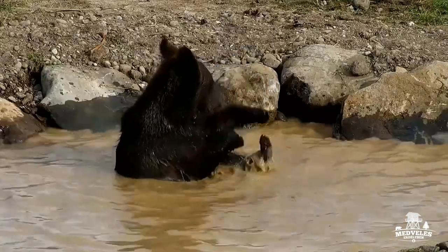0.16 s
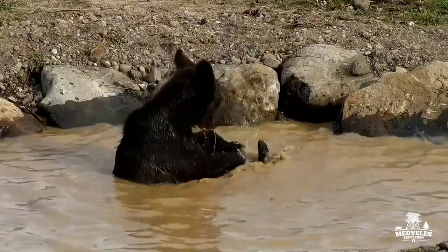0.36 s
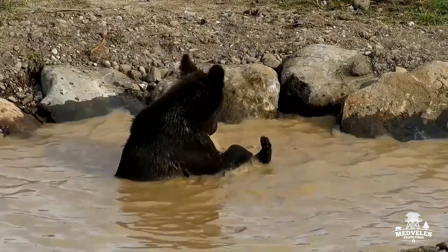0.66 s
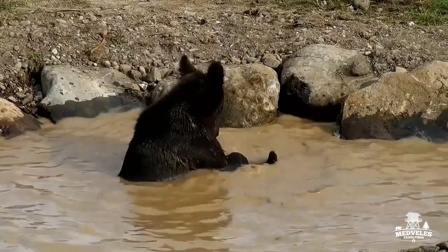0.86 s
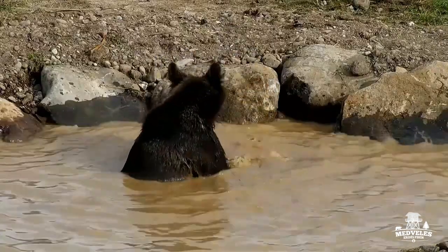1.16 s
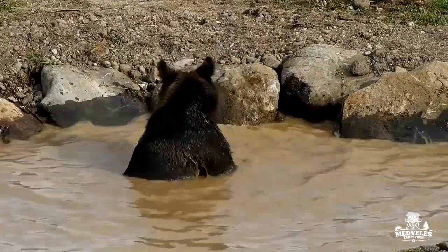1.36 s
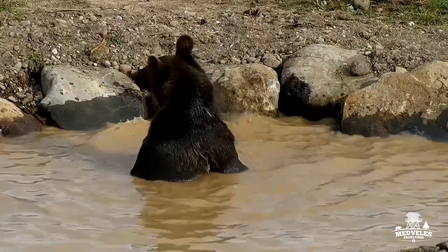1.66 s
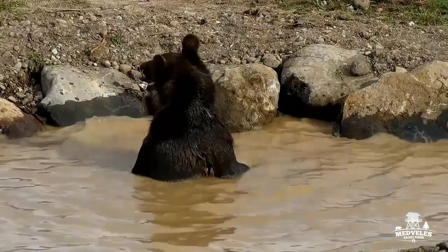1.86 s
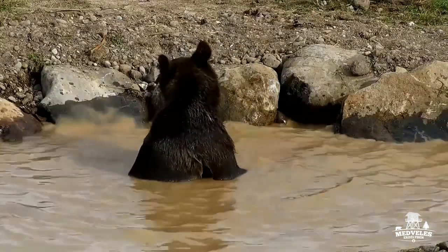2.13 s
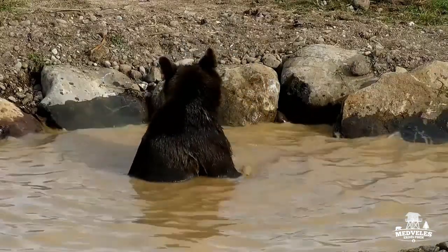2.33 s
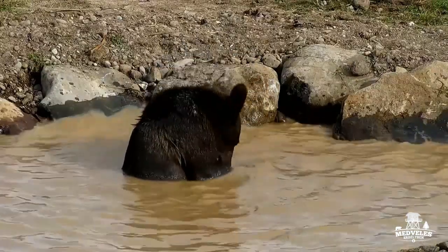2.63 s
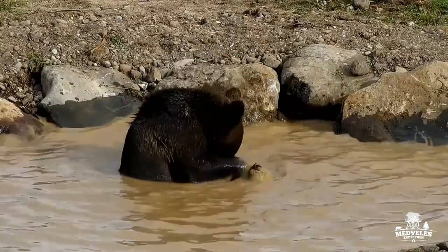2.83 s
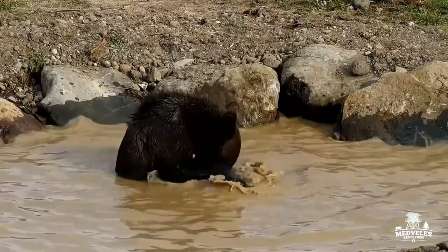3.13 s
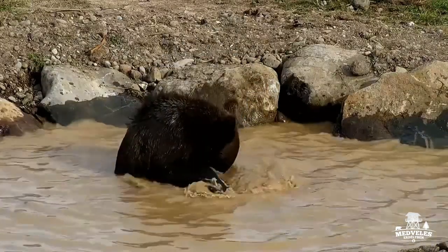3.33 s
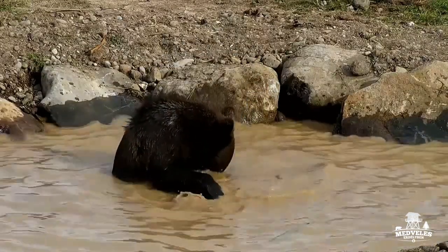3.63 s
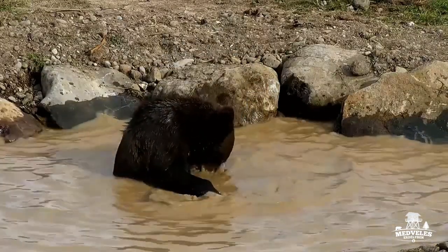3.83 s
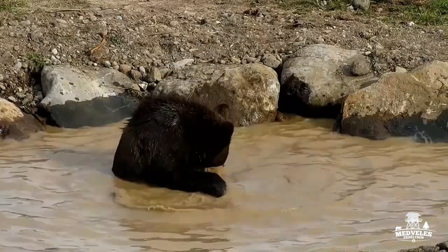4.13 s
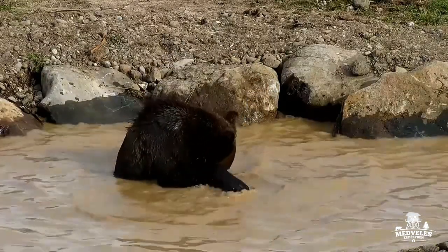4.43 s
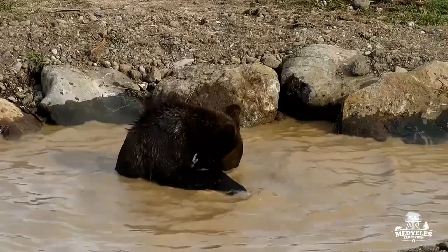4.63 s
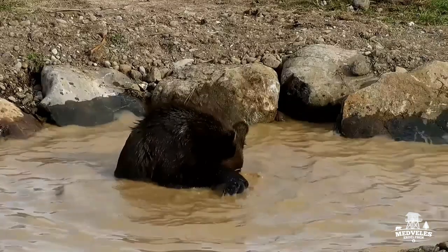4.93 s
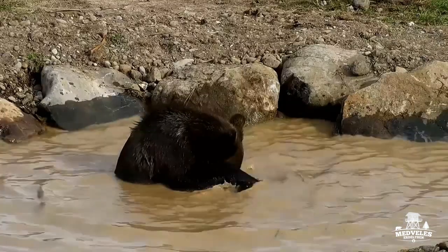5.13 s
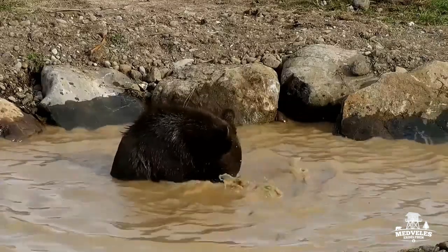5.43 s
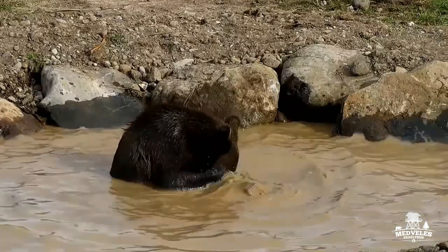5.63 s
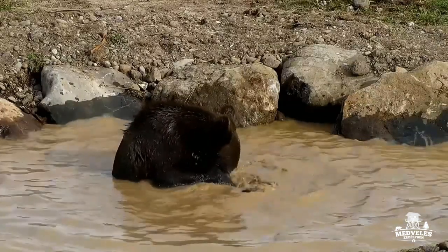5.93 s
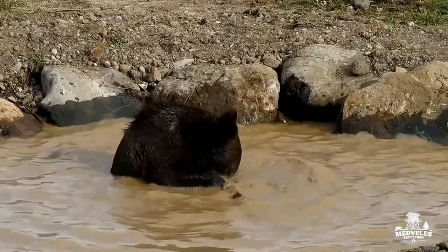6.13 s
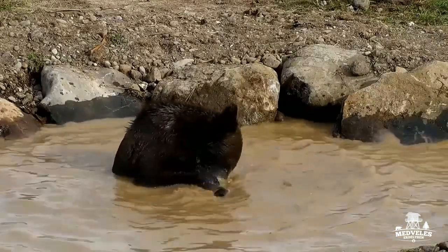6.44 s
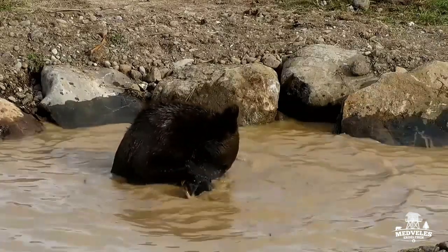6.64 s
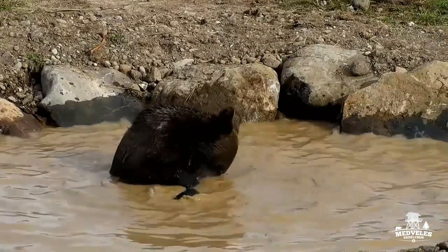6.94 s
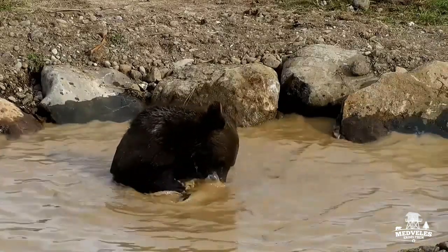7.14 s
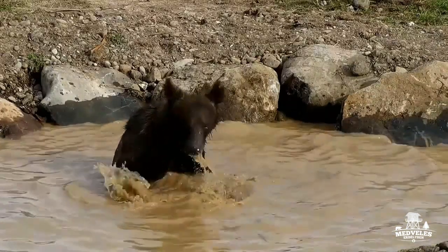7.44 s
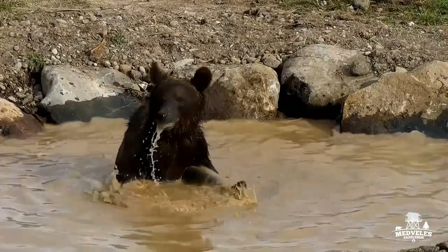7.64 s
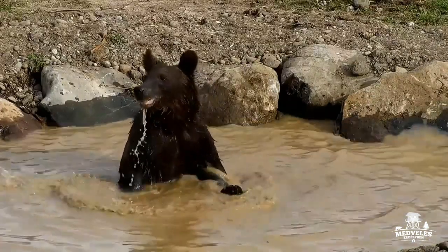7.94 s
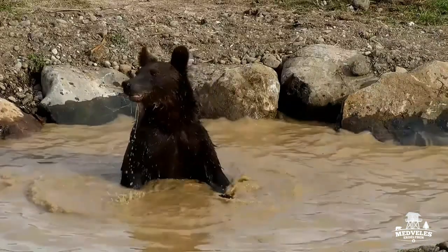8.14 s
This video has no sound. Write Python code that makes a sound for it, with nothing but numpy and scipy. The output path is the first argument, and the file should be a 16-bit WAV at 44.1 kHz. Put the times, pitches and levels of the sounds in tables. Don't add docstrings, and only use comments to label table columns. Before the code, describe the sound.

Wet splashes and gurgling bubbles from a bear stirring shallow water, pausing between bouts, then a loud closing slosh with dripping drops outdoors.

```python
import sys
import numpy as np
from scipy import signal
from scipy.io import wavfile
from scipy.ndimage import uniform_filter1d, map_coordinates

SR = 44100
rng = np.random.default_rng(int(sys.argv[2]) if len(sys.argv) > 2 else 0)


def invert_db(level):
    return 10 ** (np.asarray(level, dtype=float) / 20)


def wrap_up_sound(samples):
    columns = np.atleast_2d(samples).T
    tamed = np.clip(columns, -1, 1)
    steps = np.round(tamed * 32767).astype(np.int16)
    wavfile.write(sys.argv[1], SR, steps)


N = 365588

# pitch_hz, density_db (per Hz)
SPRAY_COLOR = [(900, -13.5), (1400, -9), (1800, -9), (2300, -6), (2900, -0.5), (3400, -0.5), (3800, -4),
               (4300, -6), (5500, -47.5)]
# start_s, spray_db, gurgle_db, fade_s (to fall 20 dB)
PAW_STROKES = [(0.01, -35, -37, 0.0963), (0.14, -41.5, -52, 0.2946), (0.44, -27, -40.5, 0.22),
               (0.509, -42, -34.5, 0.3255), (0.641, -32.5, -43.5, 0.1213), (0.895, -43.5, -44.5, 0.39),
               (1.3, -46, -42, 0.21), (1.42, -46.5, -51, 0.14), (2.0, -68.5, -46.5, 0.04),
               (2.79, -51, -62.5, 0.55), (2.97, -65, -49.5, 3.1), (3.16, -38.5, -38.5, 0.06),
               (3.24, -35.5, -34.5, 0.6662), (3.47, -37.0, -41, 0.4), (3.66, -50, -35.5, 0.4463),
               (3.79, -39.5, -35.5, 0.132), (3.9, -51, -53.5, 0.97), (4.57, -42, -50, 0.3067),
               (4.72, -45, -44, 0.2657), (4.886, -43, -41.5, 0.1237), (5.0, -59, -52.5, 0.73),
               (5.415, -33.0, -30.5, 0.2014), (5.5, -31, -30.5, 0.1534), (5.719, -37, -52, 0.16),
               (5.971, -44.5, -42.5, 0.18), (6.687, -43, -44, 0.0844), (7.357, -28, -24.5, 0.2772),
               (7.561, -23.5, -27.5, 0.14), (7.89, -35, -44.0, 0.5163)]
# start_s, spray_db, gurgle_db, fade_s (to fall 20 dB)
MORE_STROKES = [(0.06, -43, -43, 0.36), (0.32, -49.5, -49, 0.75), (0.39, -39, -48, 0.1069),
                (1.05, -52.5, -52, 0.36), (1.24, -49, -42, 0.1676), (2.47, -54, -63.5, 0.25),
                (4.2, -48.5, -52.5, 0.01), (4.44, -46.5, -46.0, 0.42), (5.27, -48.5, -53, 0.35),
                (5.6, -35.5, -35, 0.2609), (6.08, -46, -48.0, 0.1566), (6.2, -57.5, -60.5, 0.5),
                (6.8, -53, -50.0, 0.2329), (7.01, -47, -68.5, 0.1364), (7.42, -24.5, -22.0, 0.1961),
                (7.67, -33.5, -33.5, 0.1542), (7.74, -38.5, -37.5, 0.3125), (8.05, -42.5, -54, 0.98)]
DENSE_FROM_DB, DENSE_SHARE = -32, 0.437


def evened(x):
    return x / np.sqrt(np.mean(x ** 2) + 1e-20)


def read(points, hz):
    f, value = np.transpose(points)
    return np.interp(np.log(hz + 1), np.log(f + 1), value, left=-100, right=-100)


def add(mix, s, sound):
    part = mix[max(round(s * SR), 0):][:len(sound)]
    part += sound[:len(part)]


def swells(s, peak_db, rise_s, fade_s, calm_db):
    hold = 1.68
    t = np.arange(0, N / SR + .01, .001)[:, None] - s
    fallen = np.maximum(-t / rise_s, np.maximum(t / fade_s, 0) ** hold)
    power = invert_db(2 * (peak_db - 20 * fallen)).sum(axis=1) + invert_db(2 * calm_db)
    return np.interp(np.arange(N) / SR, np.arange(len(t)) / 1000, 10 * np.log10(power))


def noise(spectrum, size, patchy_db, flicker_db):
    frames, hz = 4 * N // size + 5, np.fft.rfftfreq(size, 1 / SR)
    a, b, patches = rng.standard_normal((frames, len(hz), 3)).T
    patches = uniform_filter1d(patches, size=3, axis=0)
    patches = evened(uniform_filter1d(patches, size=6000 // size, axis=1))
    flicker = evened(uniform_filter1d(rng.standard_normal(frames), size=3))
    level_db = read(spectrum, hz)[:, None] + patchy_db * patches + flicker_db * flicker
    z = (a + 1j * b) * invert_db(level_db)
    return evened(signal.istft(z, nperseg=size, noverlap=3 * size // 4)[1][:N])


def ring(hz, t60, rise, soft):
    t = np.arange(int(.25 * SR)) / SR
    turns = hz * (t + rise * t ** 2 / t60)
    onset = 1 - np.exp(-t * hz / soft)
    return np.sin(2 * np.pi * turns) * invert_db(-60 * t / t60) * onset


def grains(spectrum, per_s, cycles, spread_db, count):
    out = np.zeros(N)
    for hz in np.geomspace(spectrum[1][0], spectrum[-2][0], count):
        when, chance, sign = rng.random((2000, 3)).T
        at = np.cumsum(-np.log(when) * SR * count / per_s).astype(int)
        size = invert_db(spread_db * np.minimum(-np.log(chance), 4)) * np.sign(sign - .5)
        train = np.bincount(at[at < N], size[at < N], N)
        shape = evened(ring(hz, cycles / hz, rise=0.102, soft=1.0))[:3000]
        out += signal.oaconvolve(train, shape * np.sqrt(hz) * invert_db(read(spectrum, hz)))[:N]
    return out / np.sqrt(uniform_filter1d(out ** 2, size=6000) + 0.015 * np.mean(out ** 2))


def spray():
    s, spray_db, _, fade_s = np.transpose(PAW_STROKES + MORE_STROKES)
    level_db = swells(s, spray_db, rise_s=0.0241, fade_s=fade_s, calm_db=-61)
    hiss = noise(SPRAY_COLOR, size=256, patchy_db=3.8, flicker_db=2.4)
    crackle = grains(SPRAY_COLOR, per_s=800, cycles=13.0, spread_db=2.8, count=14)
    fused_db = DENSE_SHARE * np.maximum(level_db - DENSE_FROM_DB, 0)
    crackle_db = np.minimum(.5 * (level_db + 56.5), 0) - 3.5 - fused_db
    full = invert_db(0.33) * hiss + invert_db(crackle_db) * crackle
    body_hz, body_full_db = 2234, -32.5
    body = signal.oaconvolve(full, signal.firwin(101, body_hz, fs=SR), "same")
    body_db = np.clip(0.281 * (level_db - body_full_db), -7, 2.5)
    return invert_db(level_db) * (full + (invert_db(body_db) - 1) * body)


def gurgle():
    # pitch_hz, density_db (per Hz)
    bubble_color = [(350, -41), (560, -1.5), (750, -2), (1000, -1.5), (1300, -2), (1600, -16), (2200, -5.5)]
    # pitch_hz, density_db (per Hz)
    slosh_color = [(180, -30), (270, 0), (350, -3), (450, -6.5), (560, 2.5), (750, -25)]
    # start_s, slosh_db
    surges = [(0.0, -46), (0.52, -38), (0.58, -41), (0.7, -47), (0.9, -45), (1.22, -48), (3.61, -40),
              (3.66, -37.5), (3.71, -35.5), (3.85, -42), (4.76, -46), (5.47, -38.5), (5.55, -41),
              (5.6, -40), (6.52, -47.5), (6.72, -47.5), (7.03, -45.5), (7.37, -36.5), (7.57, -30),
              (7.73, -45)]
    s, _, gurgle_db, fade_s = np.transpose(PAW_STROKES + MORE_STROKES)
    lingering_s = 1.048 * fade_s
    level_db = swells(s, gurgle_db, rise_s=0.0262, fade_s=lingering_s, calm_db=-56)
    surge = invert_db(swells(*np.transpose(surges), rise_s=0.0482, fade_s=0.106, calm_db=-58))
    churn = noise(bubble_color, size=512, patchy_db=3.0, flicker_db=-0.5)
    swarm = grains(bubble_color, per_s=700, cycles=13.3, spread_db=3.5, count=16)
    deep = grains(slosh_color, per_s=120, cycles=15.4, spread_db=1.5, count=8)
    fused_db = DENSE_SHARE / 2 * np.maximum(level_db - DENSE_FROM_DB, 0)
    small = invert_db(level_db) * (invert_db(fused_db - 9.5) * churn + invert_db(-5.5 - fused_db) * swarm)
    slosh = np.hypot(surge, invert_db(level_db - 24))
    return small + invert_db(-2.5) * slosh * deep


def drops():
    # start_s, peak_db,
    # pitch_hz
    smacks = [(0.0313, -15, 2535), (0.1467, -15, 3046), (0.1973, -16, 3571), (0.4562, -7, 3165),
              (0.5578, -10, 2979), (0.6823, -19, 2861), (0.8957, -23, 2920), (0.9007, -24, 3165),
              (0.988, -17, 3295), (1.0603, -21, 2748), (1.2395, -25, 2979), (1.3086, -26, 3040),
              (1.4145, -25, 3430), (1.4308, -24, 3644), (2.493, -30, 3229), (2.7941, -24, 2979),
              (2.8422, -21, 3295), (2.8939, -24, 2920), (3.02, -26, 2485), (3.1565, -19, 3295),
              (3.1615, -20, 2979), (3.1723, -12, 3229), (3.2512, -17, 2535), (3.2515, -9, 3295),
              (3.2544, -17, 1912), (3.2837, -10, 3295), (3.3066, -7, 2435), (3.3762, -15, 2920),
              (3.4102, -16, 3295), (3.5054, -12, 2920), (3.5755, -16, 3295), (3.5844, -15, 2693),
              (3.6635, -19, 2031), (3.8186, -19, 3500), (3.9918, -26, 3295), (4.217, -20, 2861),
              (4.2231, -28, 2861), (4.4263, -27, 2861), (4.4263, -25, 1951), (4.4265, -26, 3571),
              (4.4689, -24, 3295), (4.4696, -26, 2387), (4.6063, -24, 3718), (4.6685, -21, 3229),
              (4.7712, -20, 2158), (4.8982, -27, 1912), (4.9057, -25, 2920), (5.2066, -31, 2387),
              (5.2744, -10, 2920), (5.2859, -17, 2748), (5.3245, -22, 3229), (5.4163, -11, 2247),
              (5.4172, -9, 2979), (5.4338, -6, 2979), (5.476, -5, 2640), (5.515, -7, 3229),
              (5.524, -11, 3229), (5.5655, -8, 3430), (5.6016, -8, 3229), (5.7413, -17, 2861),
              (5.7417, -20, 1991), (6.0043, -29, 2073), (6.0045, -23, 3229), (6.1977, -21, 3571),
             (6.7147, -17, 2920), (6.8401, -25, 3295), (6.9329, -17, 3229), (7.027, -25, 3102),
             (7.0361, -24, 3295), (7.4365, -11, 2031), (7.5766, -2, 2485), (7.5898, -7, 2640),
             (7.7644, -14, 2748), (7.902, -6, 3500), (7.9023, -8, 2861), (7.9338, -12, 3295),
             (8.0832, -17, 2387), (8.1354, -19, 1951), (8.2685, -5, 3229)]
    # start_s, peak_db, pitch_hz
    plinks = [(0.015, -17, 2979), (0.4295, -27, 2073), (0.463, -13, 2920), (0.5179, -17, 3040),
              (0.6592, -21, 3362), (0.8637, -29, 2485), (0.8914, -32, 2158), (0.9197, -30, 3304),
              (2.8941, -26, 3718), (3.2442, -25, 2435), (3.481, -23, 2640), (3.8005, -14, 3571),
              (4.2989, -35, 2158), (4.7438, -26, 2158), (4.8923, -28, 2804), (4.8998, -31, 2804),
              (5.5354, -14, 2693), (6.0873, -31, 2861), (6.1556, -32, 3270), (6.2986, -39, 2115),
              (6.6855, -27, 2387), (6.6977, -22, 2748), (6.717, -27, 1951), (7.0172, -20, 3102),
              (7.3696, -17, 2979), (7.4166, -11, 2031), (7.4311, -16, 2031), (7.585, -12, 2920),
              (7.5991, -18, 2031), (7.6844, -19, 2435), (8.0229, -18, 2804)]
    smack_rise_s, smack_t60, smack_wide = .001, .02, 1.45
    events = [(*row, .013) for row in smacks] + [(*row, .03) for row in plinks]
    out = np.zeros(N)
    puff = noise(SPRAY_COLOR, size=256, patchy_db=1.0, flicker_db=0.71)
    t = np.arange(int(.25 * SR)) / SR
    for s, db, hz, t60 in events:
        band = signal.butter(2, [hz / smack_wide, hz * smack_wide], "band", fs=SR)
        burst = evened(signal.lfilter(*band, np.resize(puff[round(s * SR):], len(t))))
        burst = burst * invert_db(-11.5 - 60 * t / smack_t60) * np.minimum(t / smack_rise_s, 1)
        add(out, s, invert_db(db) * (burst + invert_db(-1.7) * ring(hz, t60, rise=.05, soft=2.5)))
    return out


def bubbles():
    # start_s, peak_db, pitch_hz, t60_s
    pockets = [(0.007, -31.5, 1258, 0.035), (0.331, -30, 1246, 0.023), (0.434, -25, 928, 0.032),
               (0.44, -28.5, 732, 0.064), (0.501, -14, 1000, 0.0203), (0.502, -26, 639.6, 0.087),
               (0.507, -26, 1630, 0.021), (0.517, -23, 1001, 0.07), (0.518, -21, 1282, 0.07),
               (0.519, -12.5, 634, 0.0274), (0.556, -25, 1253, 0.031), (0.652, -37, 680, 0.087),
               (0.658, -17.5, 915, 0.022), (0.671, -31.5, 1869, 0.022), (0.844, -30, 607, 0.046),
               (0.894, -29, 1267, 0.0316), (1.236, -43, 1547, 0.105), (1.243, -37.5, 1322, 0.1),
               (1.307, -17.5, 978, 0.0228), (1.308, -20, 623, 0.0184), (1.34, -27.5, 698, 0.042),
               (1.343, -22.5, 1253, 0.0204), (1.423, -38.5, 1940, 0.048), (1.434, -23, 1615, 0.0247),
               (1.722, -35.5, 1546, 0.0202), (1.793, -29, 1216, 0.031), (1.832, -28.5, 831, 0.085),
               (1.992, -33.5, 621.6, 0.105), (2.016, -27, 1097, 0.076), (2.043, -37, 1292, 0.022),
               (2.047, -40, 1120, 0.065), (2.156, -36.5, 1544, 0.0223), (2.178, -40.5, 783, 0.108),
               (2.317, -46, 1069, 0.098), (2.355, -39.5, 712.4, 0.093), (2.854, -43, 1265, 0.047),
               (2.986, -32.5, 1007, 0.0506), (3.029, -26.5, 1282, 0.0366), (3.157, -20.5, 588, 0.082),
               (3.161, -18, 1232, 0.0228), (3.164, -19.5, 1600, 0.0227), (3.244, -17.5, 1514, 0.0226),
               (3.302, -25.5, 929, 0.076), (3.303, -25, 669, 0.0456), (3.368, -18.5, 1624, 0.0244),
               (3.37, -15.5, 690, 0.0223),
               (3.373, -19, 1000, 0.0214), (3.437, -24, 1546, 0.021), (3.448, -32.5, 615, 0.096),
               (3.553, -12.5, 1253, 0.0231), (3.571, -25.5, 1550, 0.034), (3.632, -20.5, 923, 0.0227),
               (3.632, -15.5, 638, 0.0198), (3.722, -25, 649.4, 0.103), (3.737, -20.5, 634.5, 0.043),
               (3.746, -21, 972, 0.0214), (3.793, -12, 488, 0.021), (3.795, -17.5, 731, 0.022),
               (3.805, -13.5, 900, 0.0204), (3.839, -16, 595, 0.0207), (4.235, -40.5, 1286, 0.068),
               (4.557, -29.5, 1290, 0.034), (4.727, -32, 1173, 0.062), (4.764, -23, 1508, 0.0214),
               (4.771, -35, 591.6, 0.104), (4.781, -37, 718.4, 0.102), (4.888, -32.5, 1354, 0.051),
               (4.889, -38.5, 928, 0.09), (4.891, -35.5, 1670, 0.035), (4.91, -27.5, 1022, 0.021),
               (5.225, -27.5, 945, 0.036), (5.397, -21.5, 1630, 0.065), (5.415, -30.5, 1522, 0.097),
               (5.416, -27.5, 882.5, 0.091), (5.432, -11, 1248, 0.0233), (5.459, -14, 656, 0.022),
               (5.494, -16, 1265, 0.0205), (5.524, -22, 1188, 0.032), (5.524, -19.5, 1555, 0.02),
               (5.526, -11, 885, 0.0231), (5.575, -26, 1123, 0.095), (5.607, -24.5, 567.4, 0.095),
               (5.74, -25.5, 1800, 0.022), (5.742, -19, 1205, 0.0233), (5.745, -25, 685, 0.02),
               (5.821, -27, 1252, 0.0337), (5.964, -36, 978, 0.09), (5.99, -34, 968, 0.07),
               (6.01, -31.5, 1328, 0.049), (6.045, -33, 696, 0.059), (6.094, -37.5, 1409, 0.102),
               (6.257, -26.5, 633.5, 0.0298),
               (6.409, -37.5, 1287, 0.074), (6.609, -34, 1740, 0.0346), (6.698, -30, 1860, 0.0234),
              (6.713, -22.5, 647, 0.0199), (6.714, -18.5, 1274, 0.022), (6.839, -26, 1300, 0.0216),
              (6.838, -18.5, 913, 0.0201), (6.84, -26, 660, 0.0223), (6.858, -35.5, 788, 0.069),
              (7.354, -16, 540, 0.082), (7.355, -12, 971.2, 0.0437), (7.358, -17.5, 672.3, 0.063),
              (7.361, -25, 1500, 0.0173), (7.374, -16, 803, 0.087), (7.38, -19, 702.3, 0.098),
              (7.4, -19, 636, 0.095), (7.41, -10.5, 905, 0.0655), (7.428, -34.5, 1593, 0.09),
              (7.435, -15, 950, 0.092), (7.459, -4, 879, 0.0228), (7.467, -21, 711.6, 0.097),
              (7.558, -19.5, 1194, 0.067), (7.56, -11, 922.5, 0.044), (7.574, -5, 671, 0.0209),
              (7.577, -16, 1281, 0.044), (7.589, -22.5, 905, 0.095), (7.603, -14, 1218, 0.0234),
              (7.68, -19.5, 1257, 0.033), (7.68, -25, 689, 0.056), (7.734, -24.5, 870, 0.07),
              (7.737, -21.5, 1240, 0.021), (7.737, -11, 505, 0.0226), (7.756, -19, 1144, 0.024),
              (7.774, -16, 946, 0.0234), (7.888, -29, 1666, 0.09), (7.9, -36, 1790, 0.044),
              (7.945, -21.5, 1204, 0.0254), (7.984, -24.5, 1204, 0.047), (7.998, -26.5, 1587, 0.0227),
              (7.998, -27.5, 993, 0.047), (8.058, -30, 1145, 0.066), (8.076, -25.5, 1543, 0.0227),
              (8.127, -31, 1554, 0.032), (8.178, -22, 1011, 0.0314), (8.267, -23.5, 1233, 0.021),
              (8.273, -34.5, 672, 0.043)]
    # start_s, peak_db, pitch_hz, glide (share of pitch per s), t60_s
    glugs = [(3.3, -33, 317.1, 2.5, 0.086), (3.806, -17, 323.4, 1.16, 0.0874), (5.66, -29.5, 350, 3, 0.033),
             (6.505, -32.5, 293, 1.5, 0.066), (6.528, -32, 432, 0.5, 0.036),
             (6.484, -43.5, 420, 1.24, 0.0765), (6.538, -36.5, 300, 14, 0.134),
             (6.594, -38, 430, 2.5, 0.1225), (4.424, -26, 380, -6.5, 0.0312),
             (7.335, -29.5, 318, 3.5, 0.055), (6.969, -27, 314, 1.5, .042), (0.515, -27, 380, 1.5, .04)]
    out = np.zeros(N)
    for s, db, hz, t60 in pockets:
        add(out, s, invert_db(db - 1.09) * ring(hz, t60, rise=1.3 * t60, soft=1.913))
    for s, db, hz, glide, t60 in glugs:
        add(out, s, invert_db(db + 7.0) * ring(hz, t60, rise=glide * t60 / 2, soft=1.813))
    return out


def off_boulders(water):
    t = np.arange(int(.15 * SR)) / SR
    rocks = rng.standard_normal(len(t)) * invert_db(-60 * t / 0.211) * (t > .004)
    return signal.oaconvolve(water, rocks / np.linalg.norm(rocks))[:N]


def off_surface(x):
    delay_s, level_db, dull_hz = .00353, -8, 2570
    late = np.pad(x, (round(delay_s * SR), 0))[:N]
    return x - invert_db(level_db) * signal.oaconvolve(late, signal.firwin(61, dull_hz, fs=SR), "same")


def wind():
    # start_s, level_db, fade_s (to fall 20 dB)
    gusts = [(2.021, -24.5, 0.0682), (2.22, -50, 0.46), (3.28, -41, 0.16), (4.019, -26.5, 0.1222),
             (4.17, -52.5, 0.5), (4.35, -31, 0.29), (4.43, -30, 0.1654), (4.52, -27, 0.16),
             (4.629, -23.5, 0.083), (4.8, -35.5, 0.14), (4.93, -34.5, 0.1431), (5.09, -33, 0.142),
             (5.2, -44.5, 0.33), (5.3, -37.5, 0.2758), (5.41, -30.5, 0.06), (7.62, -41.5, 0.07),
             (7.73, -48, 0.14), (7.86, -50.5, 0.38)]
    # center_s, peak_db, pitch_hz
    thumps = [(1.8, -35, 55), (3.29, -32.5, 90), (4.806, -29, 48), (5.769, -39.5, 50), (7.625, -31.5, 59.6),
              (2.0177, -11, 106.4), (4.014, -18.5, 71.24), (4.0426, -14.5, 135), (4.346, -19.5, 75),
              (4.3712, -18, 94.78), (4.4265, -3, 153.3), (4.435, -10.5, 130), (4.5118, -17, 91),
              (4.5366, -19.5, 100.5), (4.626, -13, 105.8), (4.652, -6.5, 165), (4.6642, -11.5, 105.5),
              (4.92, -19, 115), (5.1139, -24, 90), (5.2053, -24, 60), (5.2861, -21.5, 84),
              (5.4612, -25, 91.3)]
    # pitch_hz, density_db (per Hz)
    wind_color = [(12, -43), (20, -8.5), (36, 3), (70, 9), (120, -0.5), (220, -13.5), (316, -19),
                  (377, -29.5), (500, -42), (650, -60), (1100, -120)]
    s, db, fade_s = np.transpose(gusts)
    level_db = swells(s, db, rise_s=0.0341, fade_s=fade_s, calm_db=-66.5)
    out = invert_db(level_db) * noise(wind_color, size=1024, patchy_db=2.5, flicker_db=2.5)
    for s, db, hz in thumps:
        turns = np.linspace(-1.5, 1.5, int(3 * SR / hz))
        push = np.cos(2 * np.pi * turns - .3) * np.exp(-(turns / .5) ** 2)
        add(out, s - 3 / 2 / hz, invert_db(db) * push)
    return out


def hum():
    # multiple (of mains pitch), level_db
    harmonics = [(1, -49), (3, -54), (5, -63.5), (7, -67), (9, -68), (11, -67.5)]
    mains_hz, whine_hz, whine_db = 50.0, 791.5, -65
    t = np.arange(N) / SR
    tones = harmonics + [(whine_hz / mains_hz, whine_db)]
    return sum(np.sqrt(2) * invert_db(db) * np.sin(2 * np.pi * k * mains_hz * t) for k, db in tones)


def quiet_air():
    # pitch_hz, density_db (per Hz)
    air_color = [(120, -32), (200, -16), (300, -18.5), (500, 2), (800, -28), (1200, -9.5), (1800, -4.5),
                 (2500, -10.5), (3200, -12), (3800, -6.5), (4300, -26.5), (5500, -49.5)]
    return invert_db(-57.5) * noise(air_color, size=1024, patchy_db=5.0, flicker_db=-2.0)


def scene():
    water = spray() + gurgle() + drops() + bubbles()
    echoed = water + invert_db(-13.5) * off_boulders(water)
    return (invert_db(0.8624) * off_surface(echoed) + quiet_air() + wind() + hum())[None]


def top_cut(x):
    return signal.sosfilt(signal.butter(12, 16500, fs=SR, output="sos"), x)


def record(dry):
    camera_rate = 8000
    smooth = signal.oaconvolve(dry[0], signal.firwin(101, 4100., fs=SR), "same")
    t = np.arange(N) / SR
    ticks = np.arange(N * camera_rate // SR + 2) / camera_rate
    joined = np.interp(t, ticks, map_coordinates(smooth, [ticks * SR], order=3))
    edge = signal.firwin(401, 15850, window=("kaiser", 9), fs=SR)
    mix = signal.oaconvolve(joined, edge, "same")[None]
    return top_cut(mix)


dry = scene()
out = record(dry)
wrap_up_sound(out)
```